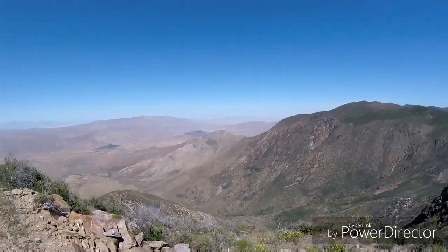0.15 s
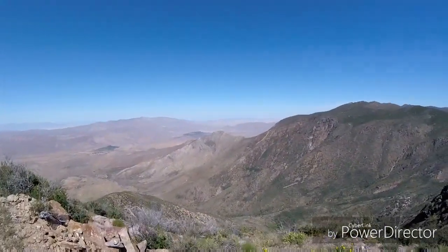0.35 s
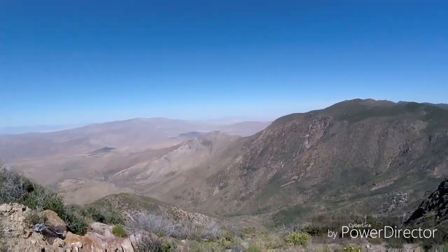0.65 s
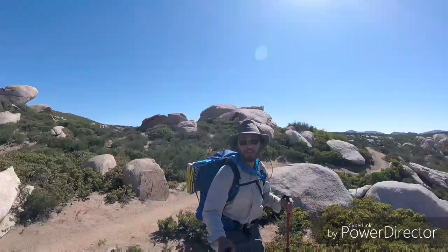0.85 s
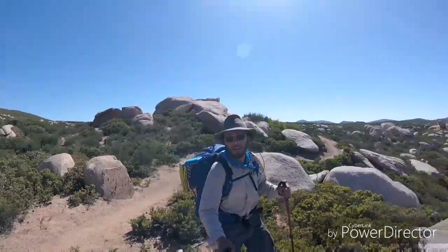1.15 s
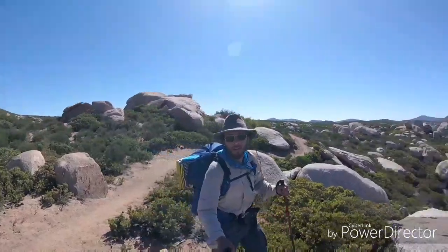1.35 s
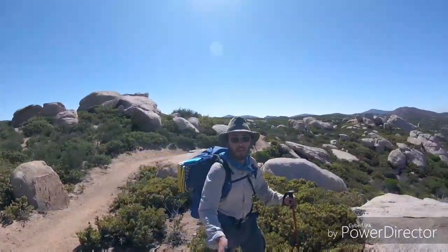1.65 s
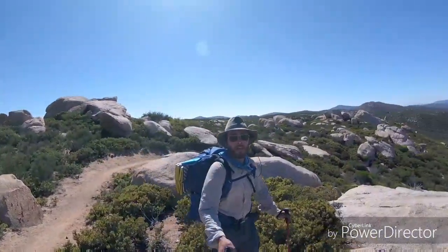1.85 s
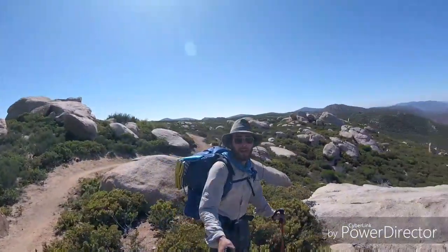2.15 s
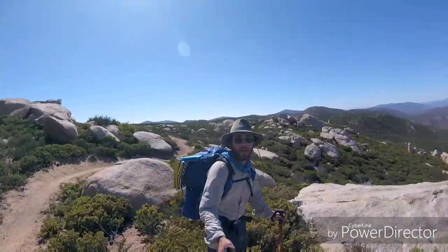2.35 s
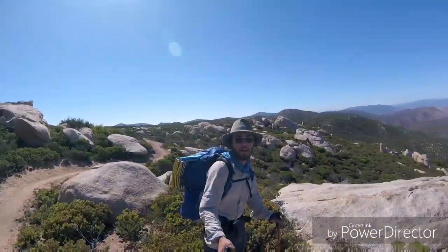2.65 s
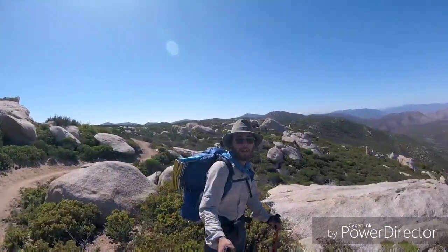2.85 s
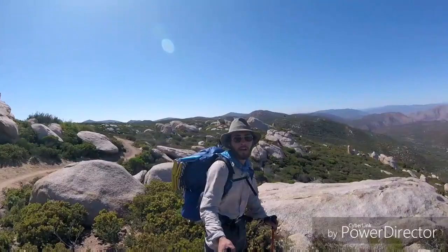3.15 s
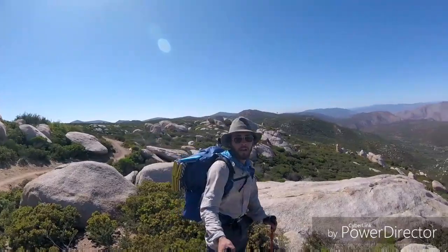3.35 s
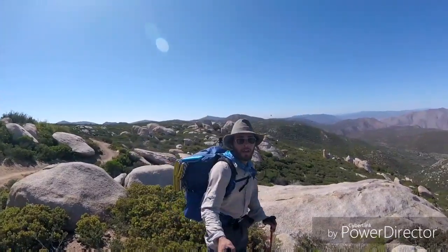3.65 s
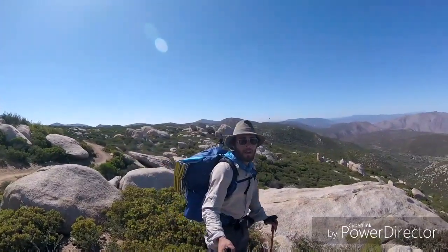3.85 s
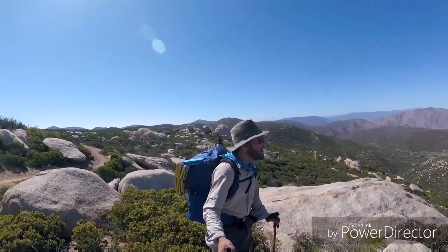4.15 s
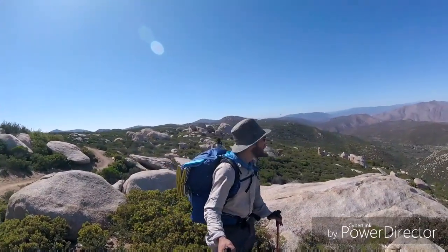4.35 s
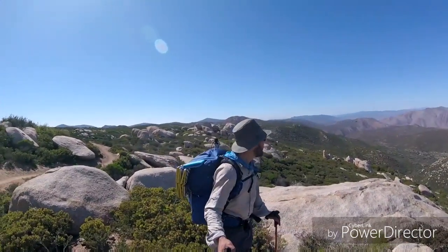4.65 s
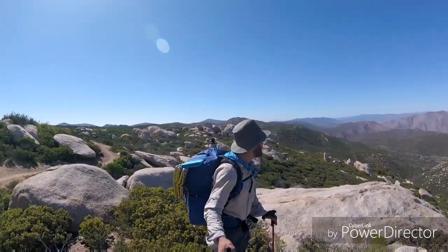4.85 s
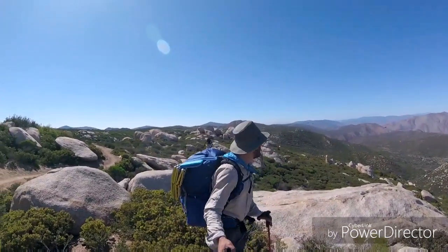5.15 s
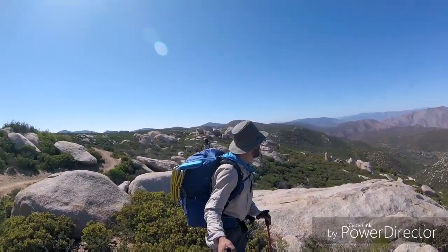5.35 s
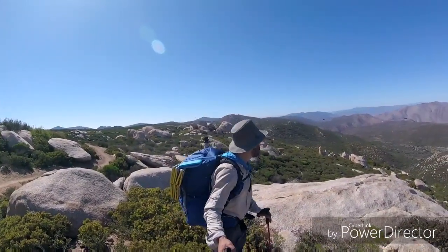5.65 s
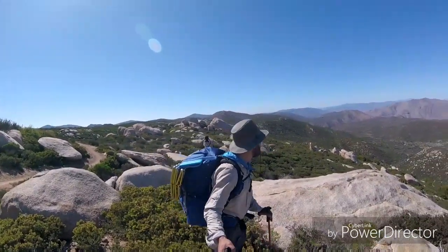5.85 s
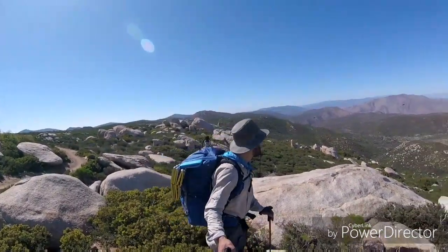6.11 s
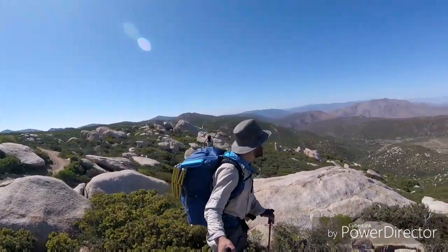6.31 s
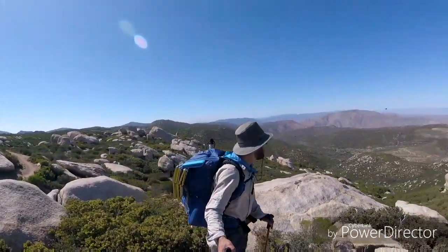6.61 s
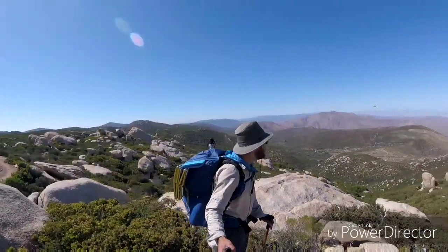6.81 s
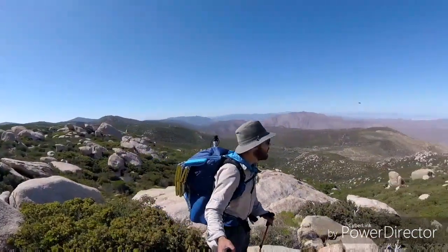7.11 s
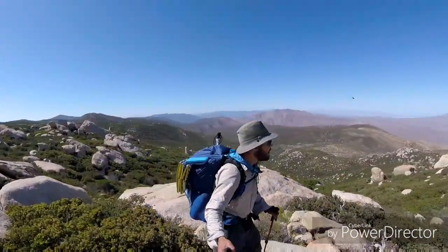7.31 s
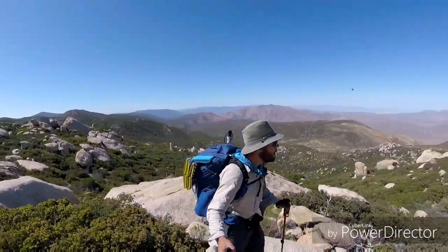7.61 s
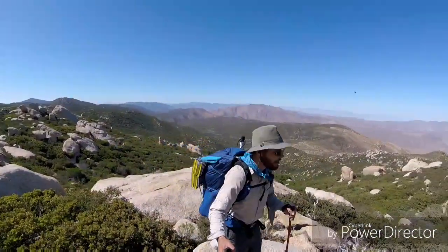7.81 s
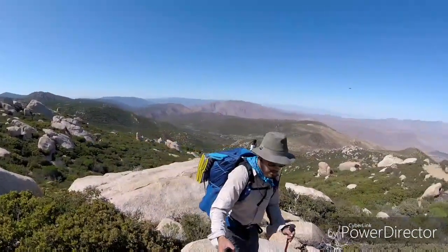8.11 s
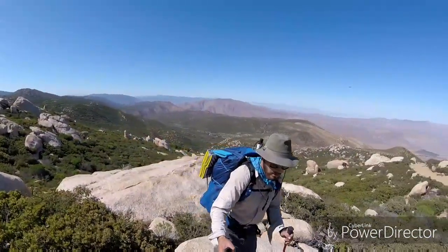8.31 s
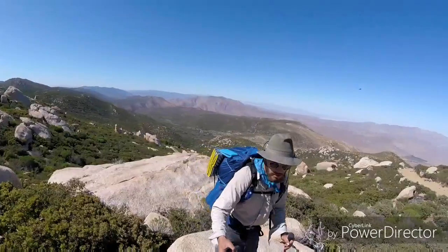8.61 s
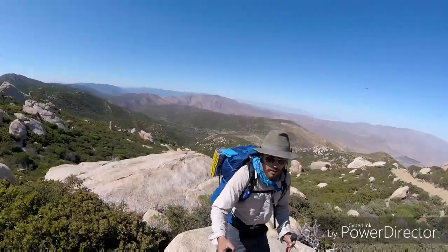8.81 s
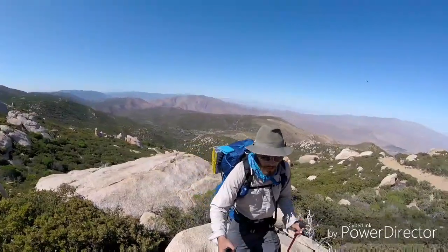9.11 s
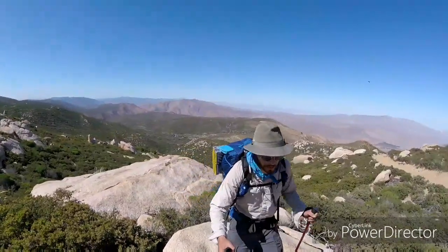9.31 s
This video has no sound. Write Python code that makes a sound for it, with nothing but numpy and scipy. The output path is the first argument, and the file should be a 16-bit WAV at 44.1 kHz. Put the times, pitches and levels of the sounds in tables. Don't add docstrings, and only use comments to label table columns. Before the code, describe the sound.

Close, mono outdoor sound on a dry rocky ridge, dominated by wind hitting a bare microphone. From 0 to 0.9 s, deep rumble and round thumps sit over thin airy hiss, with a pole tick at 0.2 s and gritty scuffing after it. At 0.92 s the scene switches abruptly: hiss drops and a brighter, fluttering gust bursts in. Around 1.9 s a hollow stone crunch, then a tap at 2.0 s. Wind sinks to near quiet by 2.85 s, then erupts from 3.0 to 4.1 s in harsh, crackling, slapping blasts. Uneven buffeting continues, peaking again at 5.7-6.0 s. After 6.5 s it settles into dull low rumble with soft puffs and faint hiss. Stone taps click at 7.3, 7.6 and 8.24 s, the last with a short scuff; a gust thumps near 8.3 s, a dry tick comes at 8.96 s, and low wind swells to the end.

```python
import sys
import numpy as np
from scipy import signal
from scipy.fft import rfft, irfft, next_fast_len
from scipy.io import wavfile

SR = 44100
rng = np.random.default_rng(int(sys.argv[2]) if len(sys.argv) > 2 else 0)


def to_wav(s):
    ch = np.atleast_2d(s).T
    pcm = np.round(np.clip(ch, -1, 1) * 32767)
    wavfile.write(sys.argv[1], SR, pcm.astype(np.int16))


def invert_db(level):
    return 10 ** (np.asarray(level, dtype=float) / 20)


N = 417627
CUT_S = 0.9207

# (frequency [Hz], density [dB/Hz])
LARGE_SPECTRUM = [(12, -34), (22, -1), (50, -1), (110, -6.5), (170, -13), (260, -36.5), (400, -74.5),
                  (800, -150)]
MIDDLE_SPECTRUM = [(60, -37.5), (120, -8.5), (200, -1), (320, -5), (450, -19.5), (650, -38), (1000, -96.5),
                   (2000, -150)]
SMALL_SPECTRUM = [(200, -35), (400, 1), (600, -4), (1000, -15), (1500, -37), (2200, -54.5), (5000, -150)]
FINE_SPECTRUM = [(500, -27.5), (1000, -2), (1600, -3), (2400, -11.5), (3500, -23), (5500, -36), (7000, -58),
                 (12000, -120)]
# (time [s], pressure [dB], speed as small over large eddies [dB],
# fine eddies [dB], middle eddies [dB])
BREEZE = [(0, -20, -24, -13, 1), (.915, -21.5, -34, -5, -1), (.93, -16, -16, 16.5, 4),
          (1.5, -29, -27, 2, -1), (2.1, -16, -18.5, 14, -1), (2.85, -38.5, -15.5, -4, -5.5),
          (3.2, -31.5, 4.5, -9, 2), (3.75, -14, -10, 5.5, 5), (4.06, -22.5, -5.5, 3, 3),
          (4.16, -27.5, -14, 4, 7), (4.6, -17.5, -14.5, -1.5, 0.5), (5.45, -21.5, -10, -9.5, 1.5),
          (5.7, -17, 0.5, -2.5, -1.7), (6.5, -21.5, -21.5, -4, 1.5), (7, -28.5, -32.5, -7, 2.5),
          (7.9, -22, -34.5, -3, 0.5), (8.7, -25.5, -32, -10, -0.7), (9.47, -14, -21, -6, -0.5)]
# (time [s], half-length [s], pressure [dB], speed [dB])
GUSTS = [(0.31, 0.27, 1.5, 5), (0.955, 0.027, 1.5, -0.5), (1.073, 0.067, 2, 3), (1.87, 0.015, -6.5, 9),
         (2.928, 0.022, -2, 7), (2.994, 0.056, 13.5, 7), (3.395, 0.019, -1, -0.5), (4.283, 0.05, 2.5, -5.5),
         (4.549, 0.066, 2, 4.5), (5.086, 0.033, 8, -6), (5.132, 0.14, -0.3, 6.5), (6.014, 0.0095, 0, 8),
         (6.421, 0.049, 1.5, 10), (6.59, 0.032, 5.5, 6), (6.782, 0.082, 6, 2), (6.89, 0.03, 7.5, 9.5),
         (8.015, 0.18, 3.5, -1.5), (8.328, 0.15, 9, 16), (8.818, 0.025, 6, 7), (1.3, 0.17, -3, 5),
         (1.71, 0.0096, 7.5, 3), (4.12, 0.023, 5, 1.5), (7.3, 0.28, 2.5, -3), (8.64, 0.02, 6, 9.5),
         (9.165, 0.017, 2, -15), (3.62, 0.034, -4.5, 4.5), (4.77, 0.033, 1.5, -0.5),
         (9.27, 0.013, 3.5, 7.5)]
# (time [s], half-length [s], pressure [dB], speed [dB])
LULLS = [(0.15, 0.032, -5, -9.5), (1.151, 0.032, -4.5, 7.5), (1.983, 0.05, -10, 1.5),
         (2.146, 0.018, -6.5, -13.5), (2.262, 0.021, 2.5, -13), (2.368, 0.23, -3.5, -1.5),
         (2.986, 0.033, -12, 1.5), (3.125, 0.04, 3.5, -16.5), (3.464, 0.027, 8.5, -16),
         (3.773, 0.018, -8, 10), (3.879, 0.13, -7, 5.5), (4.915, 0.091, -3, 2.7), (4.982, 0.027, -5, -3.5),
         (5.18, 0.025, -1, -10.5), (5.549, 0.067, -4.5, -19), (5.658, 0.026, 0.5, -17),
         (5.78, 0.034, -1, -7.5), (5.968, 0.11, -5, 3.5), (6.181, 0.021, -4.5, -3.5),
         (6.478, 0.031, 6.5, -8), (7.832, 0.073, -7.5, -7), (8.217, 0.035, -6, -16),
         (8.356, 0.027, -6, -11), (8.52, 0.035, -6, -14.5), (8.711, 0.079, -9, 0), (9.088, 0.049, -6.5, 1),
         (9.202, 0.11, -4, -2.5), (9.215, 0.031, 0.5, -18.5), (9.326, 0.015, -12.5, -3.5)]
# (offset [dB], slope per speed [dB/dB], slope per pressure [dB/dB])
EDDY_LAW = [
    (1.89, 0.0844, 1.0819),
    (2, 0.5562, 1.13),
    (3.5, 1.3857, 1.06),
    (-19.5, 1.9, 1.12),
]
# (frequency [Hz], density [dB/Hz])
HISS_SPECTRUM = [(400, -2), (1100, -11.5), (2500, -9.5), (4000, -19), (6300, -14), (8500, -17),
                 (13000, -27.5), (15500, -34)]
# (time [s], level [dB])
HISS_LEVEL = [(0, -70), (.92, -69.5), (.922, -79), (1.4, -77.5), (3.4, -71), (3.75, -75), (5.9, -76.5),
              (7.9, -71.5), (8.4, -75.5), (9.47, -72)]
# (time [s], peak [dB], 1 push or -1 suction)
THUMPS = [(0.0333, -10, -1), (0.2437, -7, 1), (0.2997, -2.5, 1), (0.361, -5, -1), (0.49, -11, -1),
          (0.612, -14, -1), (0.7246, -6, -1), (0.9501, -4, -1), (1.03, -3.5, -1), (1.063, -13.5, 1),
          (1.9031, -9.5, -1), (2.0796, -8, 1), (2.1129, -12.5, -1), (3.019, -21, 1), (3.2065, -25, 1),
          (3.401, -8.5, 1), (3.439, -5, 1), (3.5029, -5.5, -1), (3.5793, -14, -1), (3.6163, -10, 1),
          (3.688, -10, 1), (3.7405, -4.5, -1), (4.3056, -7.5, 1), (4.4574, -8.5, -1), (4.5033, -11, 1),
          (4.617, -12, -1), (4.6722, -11, 1), (4.7033, -11, 1), (4.7537, -11, -1), (4.787, -9, -1),
          (4.927, -11.5, -1), (5.042, -10, -1), (5.071, -4, -1), (5.15, -14.5, -1), (5.2041, -9.5, -1),
          (5.286, -6.5, -1), (5.403, -6, -1), (5.6769, -2, -1), (5.7358, -5, -1), (5.8587, -10, -1),
          (5.896, -13, -1), (6.0963, -11, 1), (6.2753, -5.5, -1), (6.353, -10.5, -1), (6.41, -14.5, 1),
          (6.444, -9.5, -1), (6.5752, -13, -1), (6.8849, -15, 1), (7.2624, -11.5, 1), (7.461, -17, 1),
          (8.0082, -11, 1), (8.134, -12.5, -1), (8.264, -8, 1), (8.313, -2, 1), (8.8136, -12.5, -1),
          (8.9409, -5.5, -1), (9.1656, -10.5, 1), (9.4135, -7, 1)]
# (time [s], peak [dB])
LIGHT_SLAPS = [(0.077, -28), (0.199, -28.5), (0.289, -29), (0.362, -22.5), (0.679, -28.5), (0.92, -32.5),
               (1.864, -20), (1.905, -18), (1.937, -20), (1.97, -23), (2.066, -22), (2.077, -17),
               (2.187, -25.5), (4.29, -24), (6.59, -30), (6.842, -34.5), (8.266, -24), (8.312, -14.5),
               (8.401, -31), (8.806, -34.5), (9.026, -21), (9.159, -26), (9.34, -30.5), (9.388, -24),
               (9.449, -16.5)]
# (time [s], peak [dB])
HARD_SLAPS = [(3.02, -11.5), (3.176, -19), (3.198, -11), (3.257, -19), (3.382, -5.5), (3.418, -7.5),
              (3.507, -13.5), (3.541, -13.5), (3.593, -21), (3.623, -15.5), (3.689, -12), (3.736, -13),
              (3.751, -12), (3.774, -15.5), (3.822, -15.5), (3.85, -19), (3.881, -23), (4.13, -18.5),
              (4.227, -20), (4.443, -23.5), (4.512, -17), (4.568, -8.5), (4.586, -14.5), (4.616, -17),
              (4.669, -19), (4.701, -15.5), (4.752, -13), (4.784, -10), (4.801, -15.5), (4.926, -21.5),
              (5.068, -12.5), (5.108, -14), (5.227, -16.5), (5.287, -4.5), (5.333, -18.5), (5.372, -16),
              (5.401, -10.5), (5.434, -19), (5.47, -32), (5.634, -23.5), (5.674, -6), (5.701, -12),
              (5.719, -4.5), (5.77, -16), (5.805, -19), (5.838, -7.5), (5.856, -7), (5.915, -3),
              (5.949, -13.5), (6.032, -11.5), (6.099, -9.5), (6.159, -16), (6.212, -20), (6.239, -14.5),
              (6.271, -20), (6.317, -30), (6.353, -26), (6.434, -18)]
# (time [s], length [s], level [dB])
SCUFFS = [(0.207, 0.083, -54.5), (0.338, 0.046, -56.5), (0.418, 0.078, -58.5), (0.29, 0.29, -60.5),
          (0.83, 0.19, -66), (2.02, 0.08, -57), (8.227, 0.038, -40), (8.963, 0.048, -64),
          (8.338, 0.046, -62)]
# (time [s], peak [dB], knock share [dB], click share [dB], ring t60 [s])
TAPS = [(0.222, -27, -8.5, -2.5, 0.016), (1.863, -50, 6, -2, 0.02), (2.02, -32.5, 0, 1.5, 0.032),
        (2.066, -49.5, 7, -2, 0.023), (2.146, -39, -9, -4, 0.005), (2.1564, -59, 2, -2, 0.016),
        (2.4797, -55.5, 3.5, -1, 0.022), (7.12, -55, -5, 1, 0.02), (7.282, -39, -5, -9, 0.049),
        (7.292, -39.5, -5.5, -6, 0.045), (7.436, -55, -14, 1, 0.01), (7.4435, -54, -14, 1, 0.01),
        (7.611, -33, -7.5, -3.5, 0.031), (8.1517, -51.5, -3, 0, 0.022), (8.176, -50, -2, 4, 0.02),
        (8.2054, -62, 6, 14, 0.02), (8.24, -25.5, 4.5, 3, 0.024), (8.962, -28.5, -9, 3, 0.0067)]
# (frequency [Hz], width [Hz], level [dB])
STONE_MODES = [(1450, 1000, 9), (2040, 1140, 4.5), (3550, 290, -8), (4770, 940, 2), (5340, 370, -11),
               (8460, 6600, 6.5)]
# (time [s], half-length [s], level [dB])
STREAMS = [(0.99, 0.085, -53), (1.26, 0.15, -59.5), (2.55, 0.34, -64.5), (2.963, 0.046, -42.5),
           (3.088, 0.023, -46), (3.167, 0.012, -41), (3.304, 0.091, -37), (3.948, 0.1, -40),
           (7.95, .22, -70.5)]
# (time [s],
# peak [dB], bright share [dB])
SCATTERED_FRONTS = [(0.9453, -39, -15), (1.0525, -48, -14), (1.0426, -36, -10), (1.09, -46, -22),
                    (5.15, -40.5, -19.5), (3.1995, -36, -19), (3.445, -36, -20)]
LONG_FRONTS = [(2.9512, -53, -21), (2.9783, -48, -24), (3.016, -35.5, -22), (3.021, -33, -24),
               (3.048, -33.5, -28), (3.1776, -50, -17), (3.1871, -50, -21), (3.2062, -31.5, -26),
               (3.223, -34, -20), (3.2407, -36, -20), (3.258, -33, -24), (3.2744, -37, -25),
               (3.2903, -42, -26), (3.3055, -46, -24), (3.3199, -40, -20), (3.3493, -43, -21),
               (3.3627, -38, -24), (3.377, -25.5, -25), (3.3993, -49, -19), (3.4187, -40, -26),
               (3.4309, -35.5, -29), (3.4773, -35.5, -24), (3.4941, -47, -18), (3.513, -32.5, -29),
               (3.546, -41, -19), (3.565, -40, -26), (3.5957, -24.5, -28), (3.617, -23.5, -25),
               (3.6377, -28.5, -19), (3.646, -40, -16), (3.678, -34, -20), (3.6992, -26.5, -29),
               (3.7144, -48, -25), (3.7247, -49, -19), (3.739, -30, -19), (3.752, -28.5, -20),
               (3.776, -21, -13), (3.79, -31.5, -5), (3.809, -23.5, -13), (3.8283, -28, -12),
               (3.8408, -45, -20), (3.8535, -40, -26), (3.8704, -39, -23), (3.8815, -43, -26),
               (3.9, -34, -22), (3.9107, -36, -27), (3.9236, -41, -14), (3.938, -36.5, -7),
               (3.949, -31, -26), (3.9768, -30, -17), (3.99, -34, -6), (4.0058, -33, -10),
               (4.0156, -41, -25), (4.029, -29, -16), (4.0405, -29.5, -15), (4.0556, -34, -13),
               (4.0979, -42, -26)]
LATE_FRONTS = [(4.4158, -46.5, -18), (4.427, -43.5, -23), (4.447, -41.5, -24), (4.5128, -53, -17),
               (4.573, -33, -24), (4.6035, -49.5, -22), (4.6217, -52, -15), (4.67, -44, -15),
               (4.7032, -40.5, -29), (4.7548, -31.5, -11), (4.787, -31, -21), (4.8042, -33, -18),
               (4.9275, -53, -20), (4.9683, -47, -19), (5.019, -49.5, -28), (5.0418, -37.5, -28),
               (5.0719, -47, -24), (5.089, -36, -24), (5.112, -38, -27), (5.122, -38.5, -21),
               (5.132, -43, -23), (5.211, -34, -31), (5.285, -35, -22), (5.3339, -45, -25),
               (5.3737, -51, -20), (5.4026, -41, -21), (5.705, -32, -25), (5.709, -36, -14),
               (5.7195, -30.5, -18), (5.7259, -23.5, -18.5), (5.7804, -50, -23), (5.8115, -26.5, -22),
               (5.84, -21.5, -23), (5.8592, -24.5, -16), (5.894, -27.5, -20), (5.9048, -21, -34),
               (5.92, -24, -28), (5.95, -39, -23), (5.971, -35, -20.5), (5.989, -41, -19),
               (6.0049, -35, -27), (6.015, -36, -21), (6.0353, -32.5, -21.5), (6.068, -43, -24),
               (6.1026, -42, -26), (6.127, -41, -20), (6.161, -43, -21), (6.2131, -53, -24),
               (6.2415, -53, -19), (6.274, -51, -17), (6.438, -50, -22)]
# (time [s], peak [dB])
JUMPS = [(1.0367, -50), (1.069, -47), (1.101, -52), (1.133, -51), (2.0929, -48.5), (3.5329, -35.5),
         (3.7573, -45), (4.013, -44), (4.0453, -51), (4.1093, -58), (4.3013, -53), (4.3653, -58),
         (4.5248, -41), (4.5569, -44), (4.717, -35.5), (5.3569, -43.5), (5.676, -37.5), (5.7345, -38),
         (8.2691, -30)]
# (time [s], peak [dB])
CRUNCH = [
    (1.849, -35),
    (1.854, -31),
    (1.862, -23),
    (1.872, -29),
]
# (time [s], peak [dB])
PUFFS = [(2.038, -20), (2.097, -22), (6.768, -23), (7.075, -31), (7.138, -30), (7.23, -27), (7.415, -24.5),
         (8.385, -22), (8.572, -27), (8.618, -31), (8.842, -23), (8.902, -21)]
# (frequency [Hz], level [dB])
SHEEN_COLOUR = [(8000, -40), (11500, 0), (14000, 6), (14500, -60)]
SWIRL_COLOUR = [(60, -32.0), (200, 3.5), (600, 10.0), (1200, -13.5), (2000, -31.0), (4000, -64.5), (9000, -140)]
GRIT_COLOUR = [(600, -16.0), (1500, -1.0), (3000, -7.5), (4000, -8), (5200, -12.0), (6500, -29),
               (10000, -49.0), (15000, -85.5)]
STREAM_COLOUR = [(400, -12.0), (800, 5.5), (1300, -2.5), (1800, -23.0), (2600, -38.5), (6000, -89.5)]
CRACKLE_COLOUR = [(600, 0.5), (1300, 1.5), (2200, -12), (3200, -23), (5000, -41.0), (6500, -51.5), (12000, -100)]
FIZZ_COLOUR = [(1500, -10), (2700, 3.5), (4400, 1.5), (5700, -8), (7000, -24.0), (12000, -70.5)]
CRUNCH_COLOUR = [(500, -25), (850, 7), (1250, -0.5), (1900, -16.5), (3000, -26), (8000, -69)]


def shaped(x, points):
    hz, db = np.transpose(points)
    n = next_fast_len(N)
    f = np.maximum(np.arange(n // 2 + 1) * SR / n, 1)
    gain = invert_db(np.interp(np.log(f), np.log(hz), db))
    y = irfft(rfft(x, n) * gain, n)[:N]
    return y / np.std(y)


def noise(points):
    return shaped(rng.standard_normal(N), points)


def curve(table, column):
    rows = np.array(table)
    return np.interp(np.arange(N) / SR, rows[:, 0], rows[:, column])


def walk(rate_hz):
    return noise([(rate_hz / 8, -20), (rate_hz / 2, 0), (rate_hz, -6), (4 * rate_hz, -60), (16 * rate_hz, -150)])


def band(x, hz, width_hz):
    return signal.lfilter(*signal.iirpeak(hz, hz / width_hz, fs=SR), x)


def add(out, s, x):
    i = max(int(s * SR), 0)
    out[i:i + len(x)] += x[:N - i]


def push(width_s):
    u = np.arange(-400, 400) / SR / width_s
    return (1 - 0.61 * u ** 2) * np.exp(-u ** 2 / 2)


def pushes(events, width_s, suction, lead_s):
    out = np.zeros(N)
    chance = rng.random((len(events), 2))
    for (s, db), (side, size) in zip(events, chance):
        pulse = push(width_s * (1.05 + 0.89 * size))
        add(out, s - lead_s, np.sign(side - suction) * invert_db(db) * pulse)
    return out


def bursts(events, colour, length_s):
    out, t = np.zeros(N), np.arange(-600, 1200) / SR
    source = np.pad(noise(colour), (600, 1200), "wrap")
    bell = np.exp(-((t - length_s / 2) / length_s) ** 2)
    for s, db in events:
        burst = bell * source[int(s * SR):][:len(t)]
        add(out, s + t[0], invert_db(db) * burst * np.std(bell) / np.std(burst))
    return out


def strays(level_db, over_db, count, spread_db=1.5):
    when, size = rng.random((count, 2)).T
    db = level_db[(when * N).astype(int)] + over_db + spread_db * (2 * size - 1)
    return list(zip(when * N / SR, db))


def eddy_levels(gust_edge=2.72, leaves_db=1.5):
    t = np.arange(N) / SR
    pressure, speed = curve(BREEZE, 1), curve(BREEZE, 2)
    for s, half_s, pressure_db, speed_db in GUSTS + LULLS:
        near = slice(max(int((s - 3 * half_s) * SR), 0), int((s + 3 * half_s) * SR))
        bell = np.exp(-np.abs((t[near] - s) / half_s) ** gust_edge)
        pressure[near] += pressure_db * bell
        speed[near] += speed_db * bell
    levels = [offset_db + push_slope * pressure + speed_slope * speed
              for offset_db, speed_slope, push_slope in EDDY_LAW]
    levels[1] += curve(BREEZE, 4)
    fine, leaves = invert_db(levels[3] + curve(BREEZE, 3)), invert_db(curve(HISS_LEVEL, 1) + leaves_db)
    levels[3] = 20 * np.log10(np.hypot(fine, leaves))
    return levels


def wind(levels):
    slow, quick = walk(17.5), walk(70)
    large = noise(LARGE_SPECTRUM) * invert_db(2.14 * slow)
    middle = noise(MIDDLE_SPECTRUM) * invert_db(2.48 * slow + 2.35 * quick)
    small = noise(SMALL_SPECTRUM) * invert_db(1.9 * slow + 2.8 * quick)
    gust = np.clip((levels[2] + 55) / 25, 0, 1)
    depth_db = gust * (2.0 * walk(35) + 3.0 * quick + 4.4 * walk(240))
    fine = shaped(rng.standard_normal(N) * invert_db(depth_db - 0.91 * gust), FINE_SPECTRUM)
    return sum(x / np.std(x) * invert_db(db) for x, db in zip((large, middle, small, fine), levels))


def hillside():
    return noise(HISS_SPECTRUM) * invert_db(curve(HISS_LEVEL, 1) + 8 + .5 * walk(11))


def sheen(level_db=-84):
    return invert_db(level_db) * noise(SHEEN_COLOUR) * (np.arange(N) < CUT_S * SR)


def thumps(small_db, calm_db=-48):
    out = np.zeros(N)
    for (s, db, side), size in zip(THUMPS, rng.random(len(THUMPS))):
        calm = small_db[int(s * SR)] < calm_db
        pulse = push(0.0011 * (0.92 + 0.71 * size + calm))
        add(out, s - 400 / SR, np.sign(side) * invert_db(db - 0.5) * pulse)
    return out


def slaps(small_db):
    events = LIGHT_SLAPS + HARD_SLAPS + strays(small_db, over_db=-1, count=30)
    swirl = invert_db(-8.0) * bursts(events, SWIRL_COLOUR, 0.0035)
    return swirl + invert_db(3.0) * pushes(events, width_s=0.00028, suction=.75, lead_s=0.00854)


def scuffs():
    grains = rng.standard_normal(N) * invert_db(1.8 * rng.exponential(size=N))
    drag = np.zeros(N)
    for s, length_s, db in SCUFFS:
        add(drag, s, invert_db(db) * np.hanning(int(length_s * SR)))
    return shaped(grains, GRIT_COLOUR) * drag


def taps(rise_s=0.00019, high_share_db=-23.5):
    out, t = np.zeros(N), np.arange(3000) / SR
    for s, db, knock_db, click_db, t60_s in TAPS:
        grit = rng.standard_normal(len(t)) * invert_db(1.0 * np.repeat(rng.standard_normal(75), 40))
        drive = grit * (1 - np.exp(-t / rise_s)) * 1000 ** (-t / max(t60_s, .004))
        shares_db = (knock_db, click_db, 0, 0, 0, high_share_db)
        for (hz, width_hz, mode_db), share_db in zip(STONE_MODES, shares_db):
            ring = band(band(drive, hz, 0.96 * width_hz), hz, 0.96 * width_hz)
            add(out, s - .001, invert_db(db + mode_db + share_db - 7.0) * ring / np.max(np.abs(ring)))
    return out


def streams():
    t = np.arange(N) / SR
    flow = sum(invert_db(db) * np.exp(-((t - s) / half_s) ** 4) for s, half_s, db in STREAMS)
    return flow * noise(STREAM_COLOUR)


def fronts(fine_db):
    listed = SCATTERED_FRONTS + LONG_FRONTS + LATE_FRONTS
    events = [(s - .001, db) for s, db, _ in listed] + strays(fine_db, over_db=1, count=40)
    bright = [(s - .001, db + share_db) for s, db, share_db in listed]
    early = [(s - .003, db) for s, db in events]
    crackle = invert_db(3.0) * bursts(events, CRACKLE_COLOUR, 0.0018)
    spray = invert_db(-7) * bursts(early, CRACKLE_COLOUR, 0.008)
    fizz = invert_db(-6.5) * bursts(bright, FIZZ_COLOUR, 0.002)
    return crackle + spray + fizz


def jumps(settle_s=0.0028):
    out, t = np.zeros(N), np.arange(1500) / SR
    for s, db in JUMPS:
        add(out, s - 2 / SR, invert_db(db + 13.5) * np.exp(-t / settle_s))
    return signal.sosfilt(signal.butter(2, 6500., fs=SR, output="sos"), out)


def crunch():
    return bursts(CRUNCH, CRUNCH_COLOUR, 0.0023)


def puffs():
    return pushes(PUFFS, width_s=0.00055, suction=.6, lead_s=400 / SR)


def scene():
    levels = eddy_levels()
    air = wind(levels) + slaps(levels[2]) + thumps(levels[2]) + fronts(levels[3]) + jumps()
    ground = taps() + crunch() + scuffs()
    return (air + ground + hillside() + streams() + sheen() + puffs())[None]


def low_pass(x):
    return signal.sosfilt(signal.butter(12, 15050, fs=SR, output="sos"), x)


def record(dry, step_db=-22, settle_s=.003):
    rounded = np.tanh(1.15 * dry) / 1.094
    mix = signal.sosfilt(signal.butter(3, 11000, fs=SR, output="sos"), rounded)
    add(mix[0], CUT_S, invert_db(step_db) * np.exp(-np.arange(1500) / SR / settle_s))
    return low_pass(mix)


dry = scene()
out = record(dry)
to_wav(out)
```